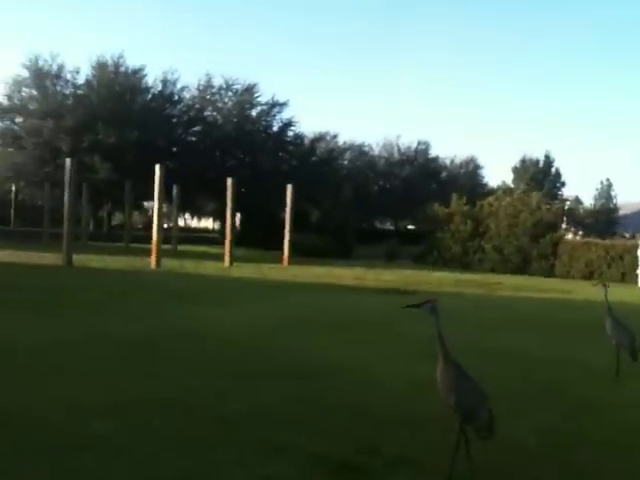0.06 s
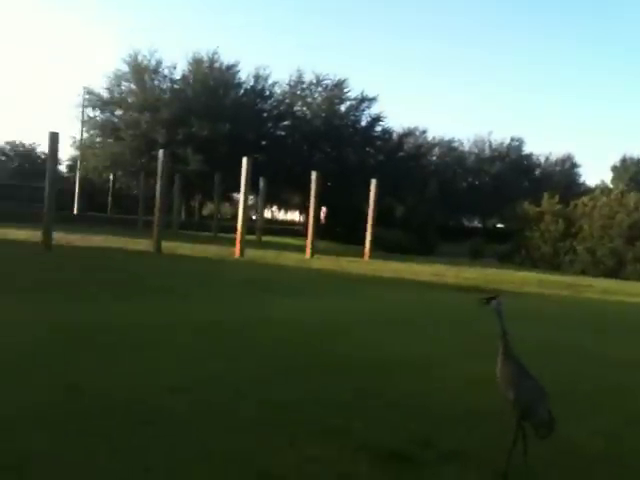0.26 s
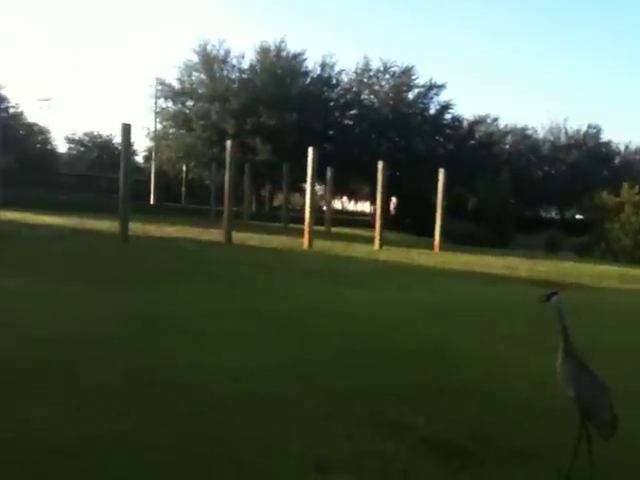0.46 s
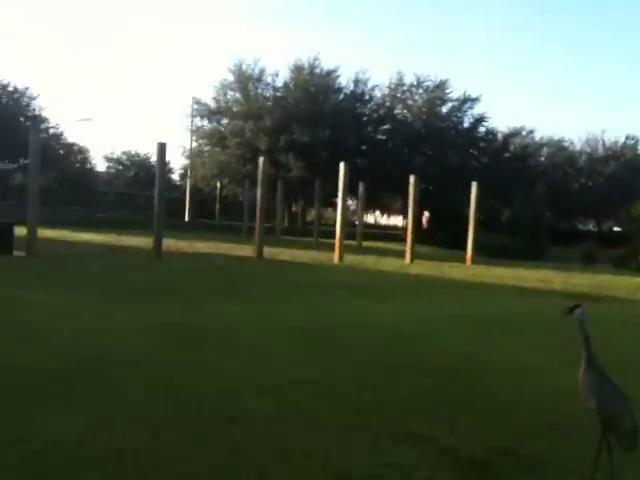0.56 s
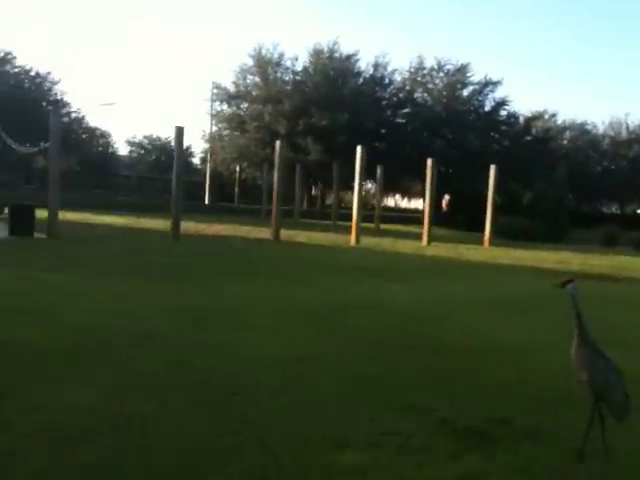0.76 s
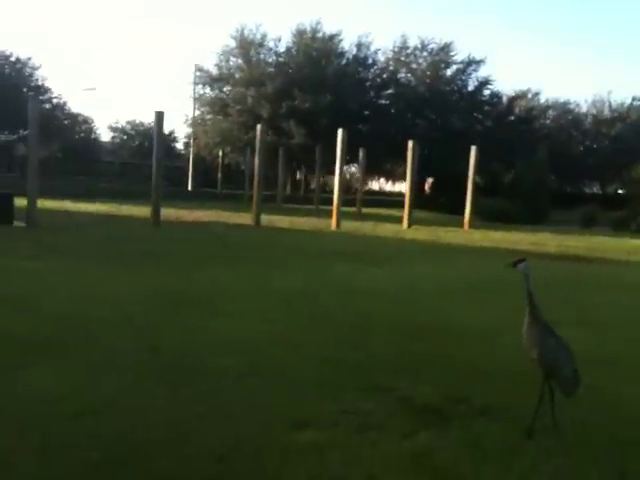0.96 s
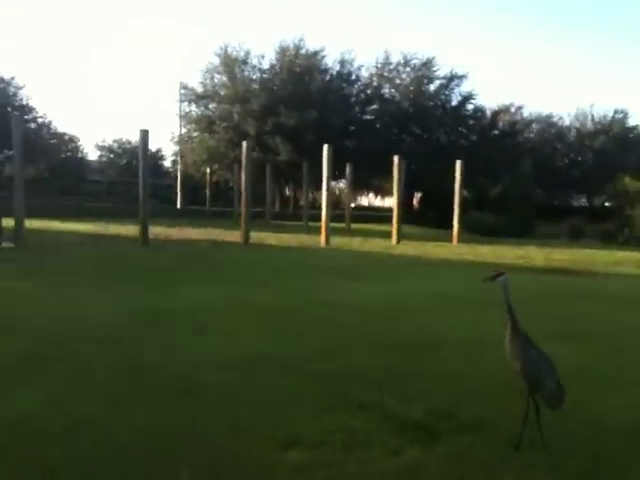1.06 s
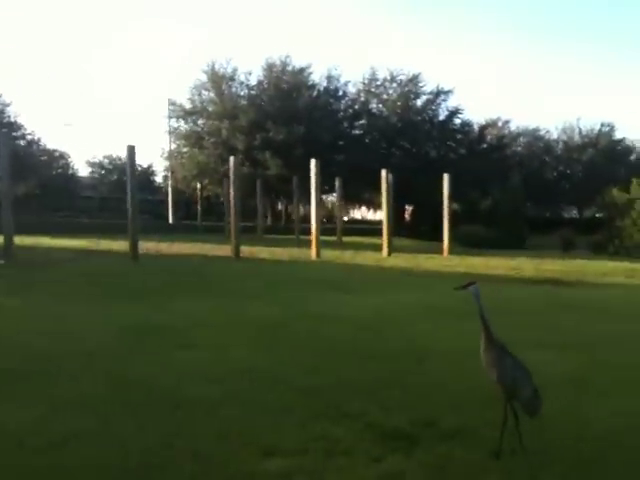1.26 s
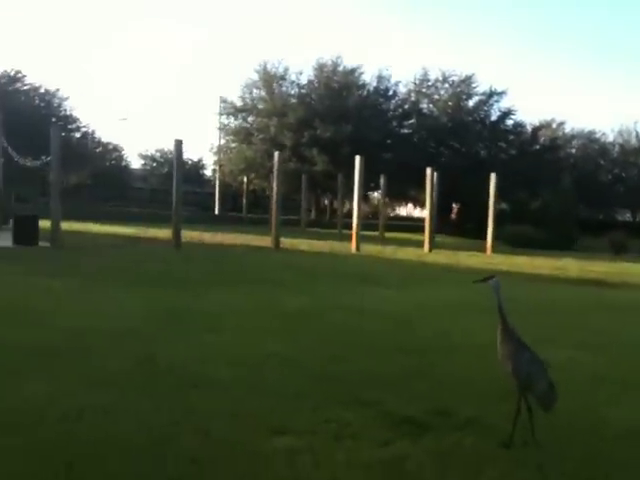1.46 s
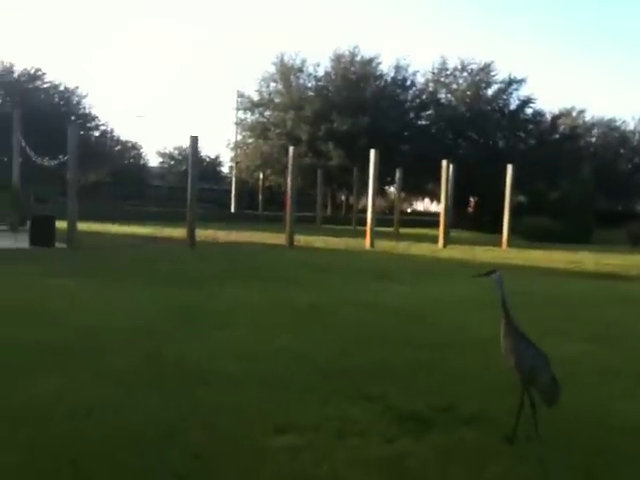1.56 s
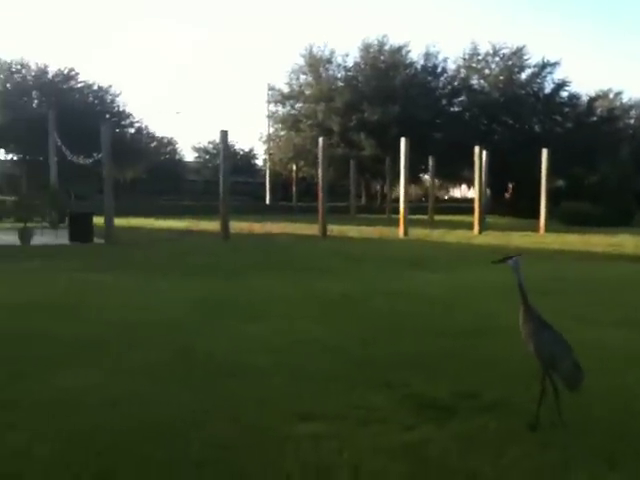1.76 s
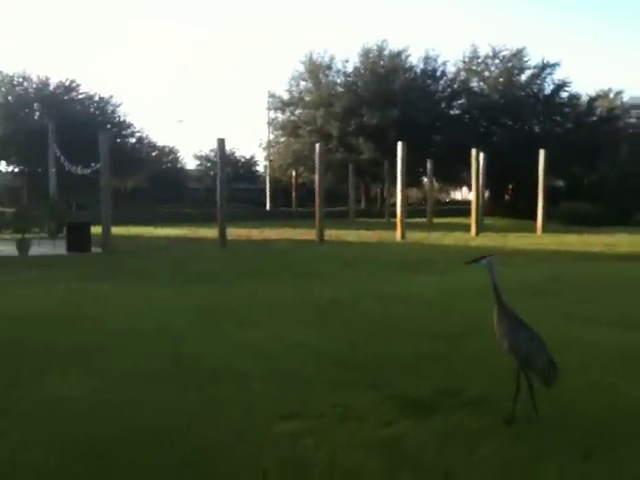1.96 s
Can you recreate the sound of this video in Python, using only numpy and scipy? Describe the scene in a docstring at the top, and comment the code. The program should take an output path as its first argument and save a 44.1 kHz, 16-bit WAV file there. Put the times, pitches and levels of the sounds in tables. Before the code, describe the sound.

Two cranes give one loud, rapid rattling call together over a low hum.

```python
"""Two sandhill cranes rattle on a lawn, over a low machine hum and faint outdoor air.
A short nasal note opens. One bird gives seven loud beats; its mate joins after the fourth,
higher and thinner, and finishes alone. Each beat is a handful of sharp snaps of the syrinx,
then a ring of the long windpipe that sags in pitch. Soft grunts fall among and after the beats.
Ground and houses throw the calls back; a faint tail dies away."""
import sys
import numpy as np
from scipy import signal
from scipy.fft import rfft, irfft
from scipy.io import wavfile

SR = 44100
rng = np.random.default_rng(int(sys.argv[2]) if len(sys.argv) > 2 else 0)


def transcribe(signal):
    """Save signal, clipped to [-1, 1], as a 16-bit WAV file at the path in sys.argv[1]."""
    frames = np.atleast_2d(signal).T
    limited = np.clip(frames, -1, 1)
    pcm = np.round(limited * 32767).astype(np.int16)
    wavfile.write(sys.argv[1], SR, pcm)


N = 90405

# beats (start [s], snap pitch [Hz], ring pitch [Hz], level [dB], snap gain [dB], snapping [ms], hold [ms])
LEAD_BEATS = [(.3190, 934, 841, -7.5, 1, 6.94, 8.5), (.3876, 949, 833, -6, 1, 6.33, 6.4),
              (.4500, 922.3, 848, -8, 1.5, 7.55, 9.4), (.5079, 916, 800, -7.5, 1, 6.74, 8.4),
              (.5660, 894, 807, -7, 0.5, 6.24, 6.9), (.6210, 861, 776, -11.5, 2.5, 7.2, 11.5),
              (.6753, 837.7, 726, -12.5, -2.5, 9.3, 9.1)]
MATE_BEATS = [(.5262, 1017, 883, -21, -1.5, 4.9, 15.7), (.6008, 1100, 891, -18.5, -4.5, 5.8, 14.4),
              (.6666, 1103, 897, -19.5, -2, 4.14, 9.1), (.7266, 1088, 904, -21, -3.5, 5.0, 6.9),
              (.7853, 1099, 922, -21, -3, 4.65, 10.7), (.8432, 1032, 880, -21, -3, 4.85, 13.2),
              (.8972, 1073, 894, -21, -3.5, 5.4, 14.2), (.9503, 1010, 851, -20.5, -4.5, 5.8, 14),
              (1.0045, 971, 842, -23, -5.5, 4.1, 13.7)]
# syrinx overtone spectra (frequency [Hz], gain [dB])
LEAD_SPECTRUM = [(1750, -0.5), (2300, -10.5), (2750, -5.5), (3700, -4), (4600, -4.5), (5500, -5.5),
                 (6500, -8), (8000, -10), (10500, -14), (16000, -15.5)]
MATE_SPECTRUM = [(2000, 3.5), (3100, 1), (4200, 1.5), (5300, 1), (6400, -1), (8000, -8), (10500, -18),
                 (16000, -19)]
NOTE_SPECTRUM = [(1100, -10.5), (1700, -8.5), (2250, -8.5), (2800, -10.5), (3400, -9), (4500, -15.5),
                 (5300, -12), (8000, -18), (11000, -26), (16000, -36)]
# windpipe resonances (frequency [Hz], gain [dB], decay [ms])
LEAD_WINDPIPE = [(587.4, -22.5, 15.4), (762, -23, 18), (1190, -56, 4.7), (1298, -20.5, 6.6),
                 (1507, -42, 15), (1936, -19.5, 7.4), (2212, -25.5, 9)]
MATE_WINDPIPE = [(677, -20, 9.8), (1160, -23, 22), (1433, -11.5, 5.5), (1564, -17, 13.8), (2250, -24.5, 13)]
# opening note (time [s], pitch [Hz], level [dB], cutoff [Hz], rustle level [dB])
NOTE_CONTOUR = [(0.189, 449.4, -46, 1000, -52), (0.196, 465, -33, 1210, -36), (.203, 523, -33, 1700, -32.5),
                (0.213, 545.6, -29, 4000, -66), (.231, 574.5, -25.5, 7900, -56),
                (0.243, 564, -28, 4400, -25), (0.246, 545, -39, 2000, -44), (.256, 547, -42.5, 1000, -36)]
# grunts (start [s], length [s], pitch [Hz], level [dB], cutoff [Hz])
GRUNTS = [(0.406, 0.064, 642, -36, 3000), (0.731, 0.013, 532, -28, 2480), (1.0570, 0.0084, 638, -29, 1560)]
# near reflections (delay [ms], gain [dB], cutoff [Hz])
LEAD_ECHOES = [(4.7, -9, 1170), (12.3, -16, 1700)]
MATE_ECHOES = [(8.6, -11, 2000), (11.2, -14, 3200)]
# reverberation spectrum (frequency [Hz], gain [dB])
YARD_SPECTRUM = [(200, 11.5), (600, -5), (1000, 6), (2000, -1), (4000, 2), (8000, -8), (16000, -13)]
# machine hum bands (centre [Hz], width [Hz], level [dB])
HUM_BANDS = [(180.7, 76, -53.5), (215.7, 16, -57), (244.3, 15.5, -57.5)]
# outdoor air spectrum (frequency [Hz], gain [dB])
AIR_SPECTRUM = [(25, -25), (60, -19), (110, -2), (160, -3.5), (260, 7), (330, -4.5), (600, -8),
                (1000, -5.5), (1400, -9), (2000, -13), (3200, -21), (5000, -27.5), (8000, -32.5),
                (15500, -35)]
# outdoor air envelope (time [s], level [dB])
AIR_LEVEL = [(0, -52.5), (1.2, -51.5), (1.6, -54), (2.05, -51.5)]

# voices; after = overtones left in the ring, lean = lopsidedness of a snap
LEAD = dict(sag_ms=1.33, swell_ms=4.6, ring_ms=2.3, snap_db=-13.5, lean_rad=0.1, lead_in_db=-20,
            after_db=-6, after_ms=6.6, bright_hz=20000, dull_hz=3470, rasp_db=-16.5, rasp_ms=3.9)
MATE = dict(sag_ms=1.05, swell_ms=1.37, ring_ms=4.4, snap_db=-6.5, lean_rad=0.23, lead_in_db=-36,
            after_db=-2.5, after_ms=8.2, bright_hz=19900, dull_hz=4500, rasp_db=-11.5, rasp_ms=12.4)
JITTER, RING_EXTRA_JITTER, RING_SAG_PER_S = 0.025, 0.051, 4.7
PIPE_SPREAD = 0.026  # the neck moves: resonances differ per beat
LEAD_IN_S = 0.005  # the windpipe stirs before each beat
TOP_HZ = 16300


def rattle(beats, voice, spectrum, windpipe, size=3800):
    """Per beat the syrinx snaps a few cycles; the windpipe rings on, lower, duller and raspier."""
    out = np.zeros(N + size)
    s = np.arange(size) / SR - LEAD_IN_S
    ms = s * 1000
    wobble = waver(750)
    rasp = noise(lambda f: gain_at(spectrum, f) * (f > 1000) / (1 + (f / 8000) ** 2))
    lead_in = undb(voice["lead_in_db"]) * np.sin(np.pi / 2 * np.clip(s / LEAD_IN_S + 1, 0, 2)) ** 2
    swell = np.sin(np.pi / 2 * np.clip(ms / voice["swell_ms"], 0, 1)) ** 2
    for start_s, snap_hz, ring_hz, db, snap_db, snap_ms, hold_ms in beats:
        i = int((start_s - LEAD_IN_S) * SR)
        slack = .5 + .5 * np.tanh((ms - snap_ms) / voice["sag_ms"])  # 0 snapping, 1 ringing
        fade = lambda decay_ms: slack * np.exp(-np.maximum(ms - snap_ms, 0) / decay_ms)
        sagging_hz = ring_hz * np.exp(-RING_SAG_PER_S * (s - hold_ms / 1000))
        jitter = (JITTER + RING_EXTRA_JITTER * slack) * wobble[i:i + size]
        pitch_hz = (snap_hz + (sagging_hz - snap_hz) * slack) * (1 + jitter)
        cutoff_hz = voice["bright_hz"] * (voice["dull_hz"] / voice["bright_hz"]) ** slack
        tone, overtones = syrinx(pitch_hz, spectrum, cutoff_hz, voice["lean_rad"])
        ring = swell / np.sqrt(1 + np.exp(2 * (ms - hold_ms) / voice["ring_ms"]))
        burst = np.exp(-((ms / snap_ms - .58) / .43) ** 4)
        after = undb(voice["after_db"]) * fade(voice["after_ms"])
        snaps = undb(voice["snap_db"]) * (burst + after) * overtones
        grit = undb(voice["rasp_db"]) * fade(voice["rasp_ms"]) * rasp[i:i + size]
        modes = np.zeros(size)
        for mode_hz, mode_db, decay_ms in windpipe:
            hz = mode_hz * (1 + PIPE_SPREAD * rng.standard_normal())
            modes += undb(mode_db) * fade(decay_ms) * np.sin(2 * np.pi * (hz * s + rng.random()))
        out[i:i + size] += undb(db) * ((ring + lead_in) * tone + modes + undb(snap_db) * (snaps + grit))
    return out[:N]


def syrinx(hz, spectrum, cutoff_hz, lean_rad):
    """Fundamental and pulse-like overtones of a membrane that snaps shut once a cycle."""
    phase = 2 * np.pi * np.cumsum(hz) / SR
    gain = lambda f: gain_at(spectrum, f) * (f < TOP_HZ) / (1 + (f / cutoff_hz) ** 2)
    return -np.cos(phase), -sum(gain(k * hz) * np.cos(k * phase + lean_rad) for k in range(2, 26))


def opening_note(t, rustle_hz=990, rustle_width_hz=170):
    """Nasal note that rises and brightens as it swells; the windpipe rustles at both ends."""
    times_s, *columns = np.array(NOTE_CONTOUR).T
    hz, db, cutoff_hz, rustle_db = (np.interp(t, times_s, column) for column in columns)
    tone, overtones = syrinx(hz * (1 + 0.014 * waver(450)), NOTE_SPECTRUM, cutoff_hz, lean_rad=0.53)
    rustle = noise(lambda f: 1 / (1 + (2 * (f - rustle_hz) / rustle_width_hz) ** 2))
    on = (t > times_s[0]) & (t < times_s[-1])
    return on * (undb(db) * (tone + overtones) + undb(rustle_db) * rustle)


def grunts(t):
    """Weak, low syrinx notes, rough with pitch jitter."""
    out, wobble = np.zeros(N), waver(320)
    for start_s, length_s, hz, db, cutoff_hz in GRUNTS:
        on = (t > start_s) & (t < start_s + length_s)
        tone, overtones = syrinx(hz * (1 + 0.055 * wobble[on]), NOTE_SPECTRUM, cutoff_hz, lean_rad=0.34)
        out[on] += undb(db) * np.sin(np.pi * (t[on] - start_s) / length_s) * (tone + 1.67 * overtones)
    return out


def with_echoes(call, echoes):
    """Direct call plus dulled returns from the ground and a near wall."""
    f = np.fft.rfftfreq(N, 1 / SR)
    returns = sum(undb(db) * np.exp(-2j * np.pi * f * delay_ms / 1000) / (1 + 1j * f / cutoff_hz)
                  for delay_ms, db, cutoff_hz in echoes)
    return irfft(rfft(call) * (1 + returns), N)


def yard_reverb(calls, t, gain=0.0716, delay_s=0.026, t60_s=1, split_hz=2500):
    """Faint diffuse tail from houses and trees."""
    age_s = np.maximum(t - delay_s, 0)
    decay = undb(-60 * age_s / t60_s)
    low = decay * noise(lambda f: gain_at(YARD_SPECTRUM, f) / (1 + (f / split_hz) ** 2))
    high = decay * noise(lambda f: gain_at(YARD_SPECTRUM, f) * f / (f + split_hz))
    response = (age_s > 0) * (low + 1.12 * high) / np.linalg.norm(low + high)
    return gain * signal.fftconvolve(calls, response)[:N]


def machine_hum():
    """Wavering hum: low, narrow noise bands."""
    return sum(undb(db) * noise(lambda f: f / (f + 60) / (1 + (2 * (f - hz) / width_hz) ** 2))
               for hz, width_hz, db in HUM_BANDS)


def outdoor_air(t):
    """Soft broadband noise, drifting in level."""
    level_db = np.interp(t, *np.array(AIR_LEVEL).T)
    return undb(level_db) * noise(lambda f: gain_at(AIR_SPECTRUM, f))


def undb(db):
    return 10 ** (np.asarray(db) / 20)


def gain_at(spectrum, hz):
    """Linear gain, interpolated in dB over log frequency."""
    points_hz, db = np.array(spectrum, float).T
    return undb(np.interp(np.log(np.maximum(hz, 1)), np.log(points_hz), db))


def noise(gain):
    """Unit-rms noise shaped by gain(Hz)."""
    x = irfft(rfft(rng.standard_normal(N)) * gain(np.fft.rfftfreq(N, 1 / SR)), N)
    return x / x.std()


def waver(cutoff_hz):
    """Unit-rms low-passed wobble."""
    return noise(lambda f: 1 / (1 + (f / cutoff_hz) ** 4))


def scene():
    """Both birds, yard, hum and air; mono."""
    t = np.arange(N) / SR
    lead = with_echoes(rattle(LEAD_BEATS, LEAD, LEAD_SPECTRUM, LEAD_WINDPIPE), LEAD_ECHOES)
    mate = with_echoes(rattle(MATE_BEATS, MATE, MATE_SPECTRUM, MATE_WINDPIPE), MATE_ECHOES)
    calls = lead + mate + opening_note(t) + grunts(t)
    return (calls + yard_reverb(calls, t) + machine_hum() + outdoor_air(t))[None]


def record(dry):
    """Soft limit on the loudest snaps, then a steep low-pass."""
    ceiling = 0.78
    rounded = dry / (1 + (dry / ceiling) ** 8) ** (1 / 8)
    return signal.sosfilt(signal.ellip(8, .2, 70, TOP_HZ, fs=SR, output="sos"), rounded)


dry = scene()
out = record(dry)
transcribe(out)
```